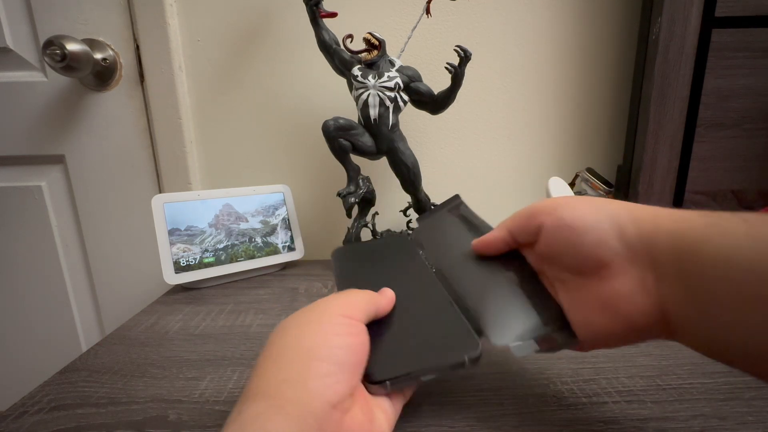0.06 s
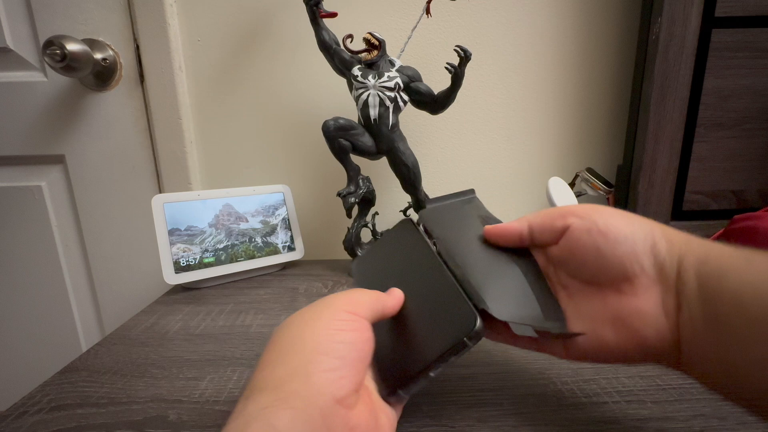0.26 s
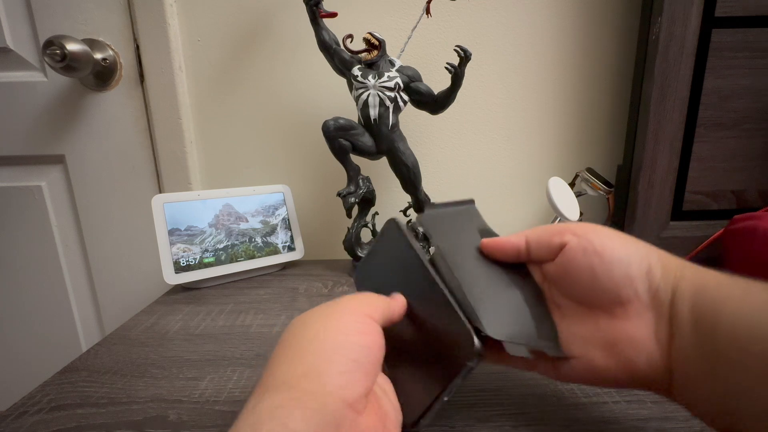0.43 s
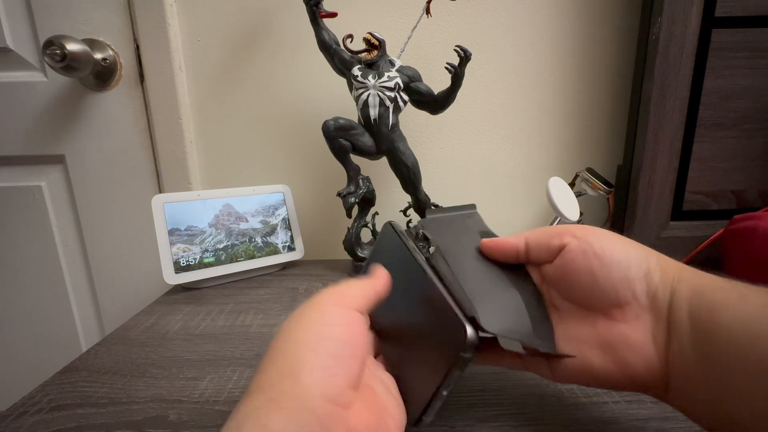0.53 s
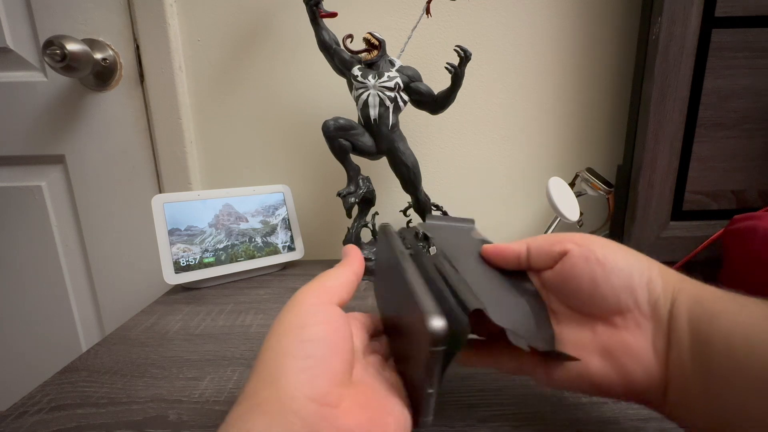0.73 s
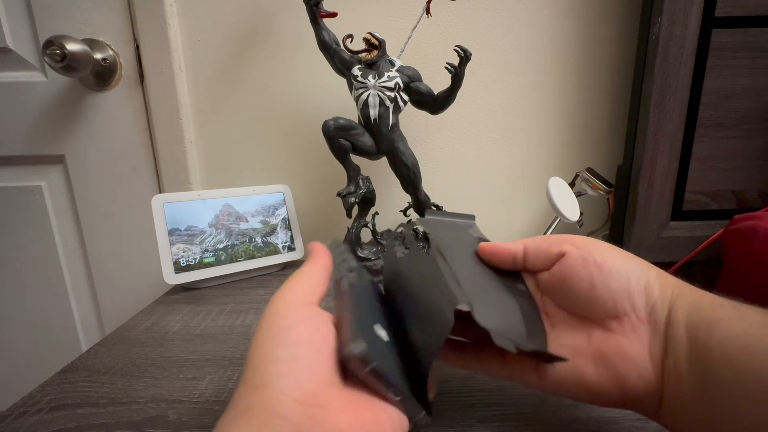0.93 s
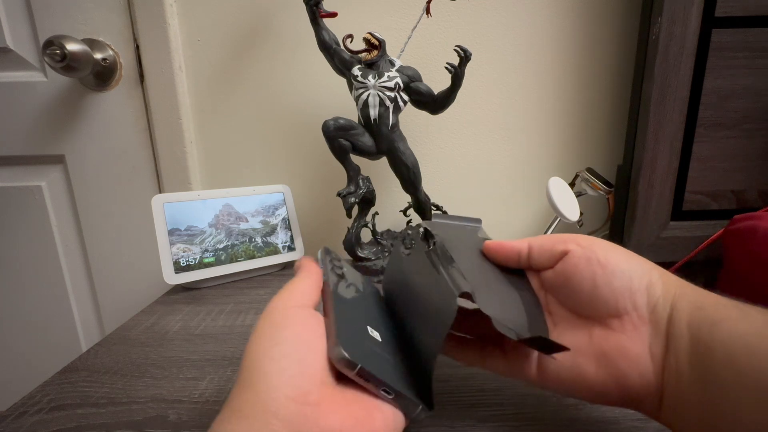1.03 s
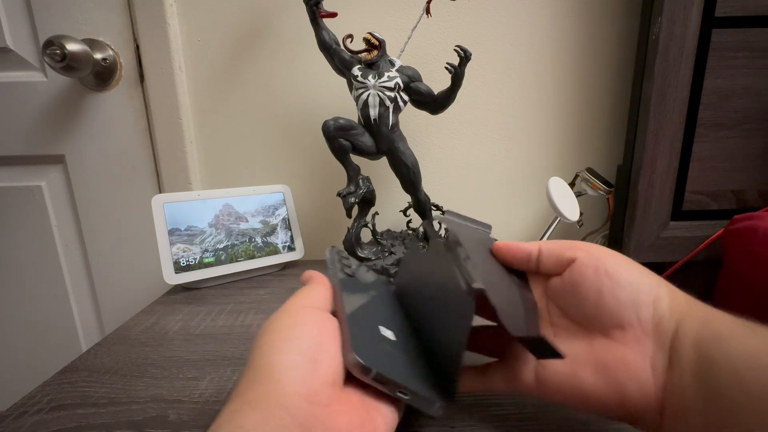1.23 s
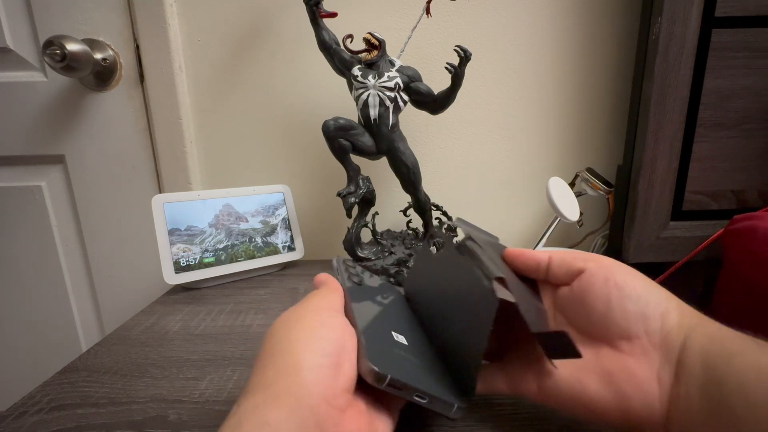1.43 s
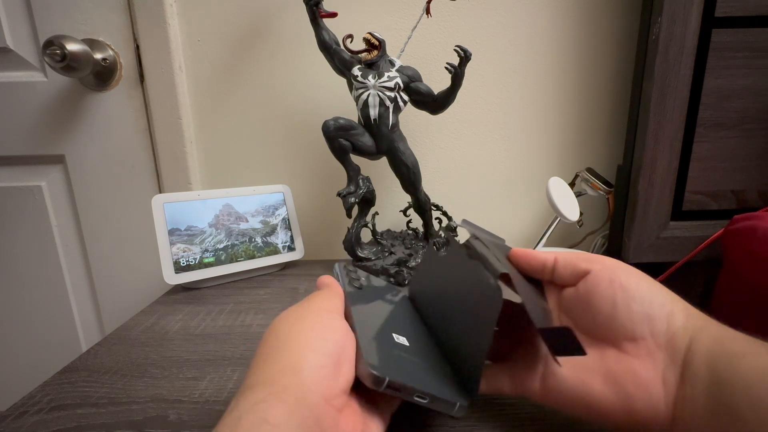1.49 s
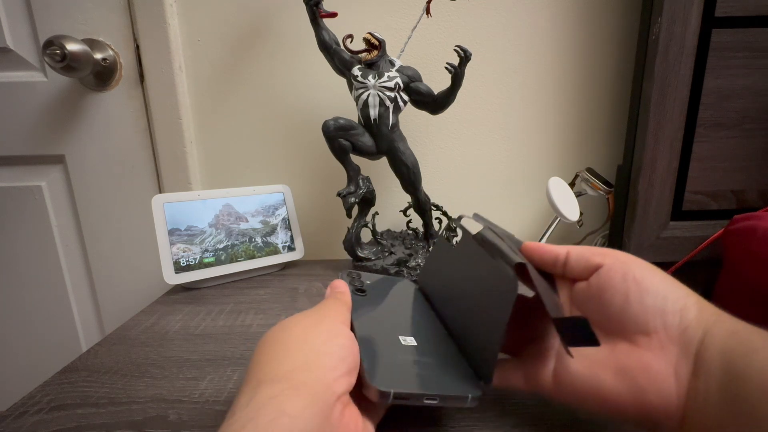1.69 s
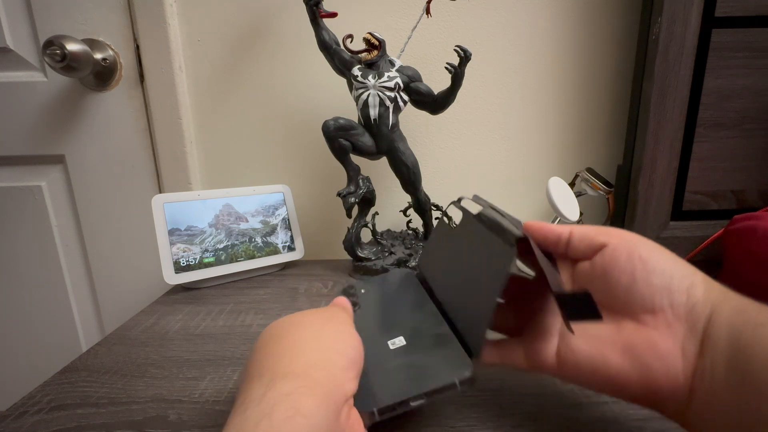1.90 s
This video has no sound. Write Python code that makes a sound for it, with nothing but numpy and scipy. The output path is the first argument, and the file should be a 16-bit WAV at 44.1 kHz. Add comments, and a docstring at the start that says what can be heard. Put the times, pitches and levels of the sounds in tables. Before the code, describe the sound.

Stiff plastic film peeled off a handheld device, sharp snaps and crackles over faint hiss, close up

```python
"""First a faint hiss over low rumble and mains hum, then sharp snaps: stiff protective film
is peeled off a new handheld device in a small room, close to a pair of microphones.
Noise grains make the film hiss; filtered noise bursts make it snap as it buckles, and a sliding sine squeaks.
Damped cosines and low sine pulses are knocks and finger thumps on the device.
A wall and the desk return these sounds as scattered echoes with a short noise tail."""
import sys
import numpy as np
from scipy import signal
from scipy.fft import rfft, irfft, next_fast_len
from scipy.io import wavfile
from scipy.ndimage import uniform_filter1d

SR = 44100
rng = np.random.default_rng(int(sys.argv[2]) if len(sys.argv) > 2 else 0)


def bounce(signal):
    """Save signal as a 16-bit WAV file at the path given by the first command-line argument."""
    frames = np.transpose(np.atleast_2d(signal))
    limited = np.clip(frames, -1, 1)
    pcm = np.round(limited * 32767).astype(np.int16)
    wavfile.write(sys.argv[1], SR, pcm)


N = 85995
T = np.arange(N) / SR


def amp(db):
    """Decibels to gain."""
    return 10 ** (np.asarray(db) / 20)


def unit(x):
    """Scales to rms 1."""
    return x / np.sqrt(np.mean(x ** 2) + 1e-20)


def read(points, hz):
    """Reads a spectrum on a log-frequency axis."""
    f, value = np.transpose(points)
    return np.interp(np.log(hz + 1), np.log(f + 1), value)


def level(points):
    """Gain over time from (t/s, level/dB) points."""
    return amp(np.interp(T, *np.transpose(points)))


def add(mix, s, sound):
    """Mixes a sound in at a time, cut off at the end of the mix."""
    part = mix[:, max(round(s * SR), 0):][:, :sound.shape[1]]
    part += sound[:, :part.shape[1]]


def bell(hz, centre_hz, width):
    """Gain of a resonance, symmetric in log frequency; width is a share of the centre frequency."""
    return 1 / (1 + (np.log((hz + 1) / centre_hz) / width) ** 2 / 2)


def colour(x, gain):
    """Causal minimum-phase filter with the given gain as a function of frequency."""
    size = next_fast_len(x.shape[-1] + 4096)
    hz = abs(np.fft.fftfreq(size, 1 / SR))
    log_gain = np.log(np.maximum(gain(hz), 1e-5))
    # the Hilbert transform of the log gain gives the phase
    response = np.exp(np.conj(signal.hilbert(log_gain)))
    return np.fft.ifft(np.fft.fft(x, size) * response).real[..., :x.shape[-1]]


def pair(three, same):
    """Left and right from one shared and two separate signals; same is the shared part of the power."""
    same = np.clip(same, 0, 1)
    return np.sqrt(same) * three[0] + np.sqrt(1 - same) * three[1:]


def noise_pair(same, count=N):
    """White noise at the two microphones."""
    return pair(rng.standard_normal((3, count)), same)


# Creases of the film giving way close to the microphones; levels are relative. Columns: t/s,
# crack level at 3 kHz/dB, crack decay/s, low edge f/Hz, tilt/(dB per octave), flexing panel f/Hz,
# panel level/dB, panel width (share of f), edge tick level/dB, left minus right level/dB
CREASE_SNAPS = [ (0.0768, -62, 0.00079, 2650, -1, 4450, -49.5, 0.17, -78, 1),
                (.1200, -48, 0.0023, 830, -3, 2170, -36.5, 0.088, -55, -1.5),
                (.2335, -35, 0.0013, 732, -5.5, 2980, -22, 0.35, -68, 1.7),
                (0.354, -34, 0.0023, 750, -2, 1620, -24, 0.038, -66, 0.5),
                (0.431, -34, 0.0005, 1570, 0, 2030, -27, 0.087, -23.5, 2.3),
                (.6505, -16, 0.00064, 1050, -2, 2140, -6.5, 0.095, -42, 1),
                (.7372, -25.5, .0014, 1570, 1.2, 3430, -19.5, 0.15, -41, 2.5),
                (0.9485, -47, 0.0036, 1094, -5, 2000, -34.5, 0.46, -29, 1.5),
                (1.1174, -61, 0.00095, 800, 0.5, 2270, -50.5, 0.53, -62, 1),
                (1.1482, -47, 0.0018, 860, 0, 1680, -57, 0.13, -40, 0.5),
                (1.1903, -52.5, 0.00079, 1194, -6, 3500, -55, 0.22, -74, 3),
                (1.2585, -35, 0.0013, 1400, -1, 2450, -22, 0.15, -34, 0),
                (1.2768, -36, 0.0011, 1350, -4.5, 5200, -26.5, 0.13, -39, 0),
                (1.2838, -39, 0.0015, 1140, -5, 5300, -37.5, 0.12, -58, -1.5),
                (1.4791, -35.5, 0.00033, 1700, -3.5, 2700, -26.5, 0.15, -49, 1.9),
                (1.9261, -43, 0.0032, 666, -0.5, 2210, -58.5, .1, -45, 2.5)]
SNAP_DB = 8  # common gain of all snaps
SWELL_S, SWELL_DB = 0.00095, -7  # rise before the crack
AFTER_S, AFTER_DB = 0.0043, -11.5  # slower decay under the crack
SNAP_SAME = 0.31
RIPPLE_DB, RIPPLE_OFFSET_DB, RIPPLE_HZ = 9, -2.25, 331.9  # uneven resonances: swing, shift, spacing
OVERTONE_RATIO, OVERTONE_DB = 1.66, -14  # second bending mode of a panel
TICK_HZ, TICK_WIDTH = 14800, 0.07


def snap(s, crack_db, decay_s, low_hz, tilt_db, panel_hz, panel_db, panel_width, tick_db, pan_db):
    """A crease gives way: a brief swell, a crack, and a quickly damped ring of the film panel."""
    lead = 192  # samples before the crack
    t = (np.arange(2048) - lead) / SR
    swell = amp(SWELL_DB) * np.exp(-abs(t) / SWELL_S)
    decay = np.exp(-abs(t) / decay_s) + amp(AFTER_DB) * np.exp(-abs(t) / AFTER_S)
    shape = np.where(t < 0, swell, decay)
    burst = noise_pair(SNAP_SAME, len(t)) * shape
    for _ in range(3):  # a crack is short in time and even in spectrum
        spectrum = rfft(burst)
        burst = irfft(spectrum / (abs(spectrum) + 1e-9))
        local_power = abs(uniform_filter1d(burst ** 2, size=40))
        burst *= shape / np.sqrt(local_power + 1e-12)
    burst /= np.linalg.norm(burst, axis=1, keepdims=True)
    ripple = rng.uniform(-1.03, 1, size=128)

    def gain(hz):
        """Crack, panel and edge tick added in power, above the low edge."""
        tilt = tilt_db * np.log2(np.maximum(hz, low_hz) / 3000)
        uneven = RIPPLE_DB * np.interp(hz / RIPPLE_HZ, np.arange(len(ripple)), ripple) + RIPPLE_OFFSET_DB
        crack = amp(crack_db + tilt + uneven)
        overtone = amp(OVERTONE_DB) * bell(hz, panel_hz * OVERTONE_RATIO, panel_width)
        panel = amp(panel_db) * np.hypot(bell(hz, panel_hz, panel_width), overtone)
        tick = amp(tick_db) * bell(hz, TICK_HZ, TICK_WIDTH)
        low_cut = np.hypot(1, (low_hz / (hz + 1)) ** 3.16)
        return np.sqrt(crack ** 2 + panel ** 2 + tick ** 2) / low_cut

    sides = amp([[pan_db / 2], [-pan_db / 2]])
    return s - lead / SR, np.sqrt(350) * amp(SNAP_DB) * colour(burst, gain) * sides


# Loudness of the peeling film, shared by hiss and crackle: t/s, level/dB
PEEL_LEVEL = [(0, -57.5), (.10, -54), (.205, -58), (.24, -42.5), (.32, -55), (.37, -55.5), (.46, -53),
              (.53, -64), (.62, -60.5), (.80, -54), (.915, -51), (1.0, -57), (1.09, -60), (1.135, -53),
              (1.19, -45.5), (1.25, -55.5), (1.36, -60.5), (1.46, -60.5), (1.56, -57), (1.66, -62.5),
              (1.745, -64), (1.80, -78.5), (1.95, -70.5)]
# Spectrum of the hiss: f/Hz, relative level per Hz/dB
HISS_SPECTRUM = [(100, -27), (550, -11.5), (950, 1.5), (1500, 5), (2200, 7.5), (3200, 1), (5500, 4),
                 (9000, 1), (14500, 6), (17000, -2.5)]
GRAINS_PER_S, GRAIN_SPREAD_DB = 7500, 3.5
SMOOTH_DB = 8.5  # smooth noise relative to the grains
FLUTTER_DB, HISS_SAME = 1.73, 0.12


def peel():
    """Countless tiny bonds let go and the film slides: a fine, grainy hiss."""
    struck = rng.random(N) < GRAINS_PER_S / SR
    sizes = amp(GRAIN_SPREAD_DB * np.minimum(rng.exponential(1, N), 5)) * struck
    grains = unit(sizes * noise_pair(HISS_SAME))
    drive = grains + amp(SMOOTH_DB) * noise_pair(HISS_SAME)
    hiss = unit(colour(drive, lambda hz: amp(read(HISS_SPECTRUM, hz))))
    flutter = unit(uniform_filter1d(rng.standard_normal(N), size=600))
    return hiss * level(PEEL_LEVEL) * amp(FLUTTER_DB * flutter)


CRACKLES_PER_S, CRACKLE_SPREAD_DB = 160, 4
CRACKLE_DB = -11  # relative to the peel level
CRACKLE_S, CRACKLE_HZ, CRACKLE_WIDTH = 0.00082, 3200, 0.7  # decay time, centre, width


def crackle():
    """Larger patches of the film let go at random with tiny, ragged ticks."""
    struck = rng.random(N) < CRACKLES_PER_S / SR
    sizes = amp(CRACKLE_SPREAD_DB * np.minimum(rng.exponential(1, N), 2)) * struck
    bursts = signal.lfilter([1], [1, -np.exp(-1 / (CRACKLE_S * SR))], sizes)
    ticks = colour(bursts * noise_pair(0.55), lambda hz: bell(hz, CRACKLE_HZ, CRACKLE_WIDTH))
    return amp(CRACKLE_DB) * unit(ticks) * level(PEEL_LEVEL)


# Fine fizz on top of the hiss when the film runs fast: t/s, level/dB
FIZZ_LEVEL = [(0, -81), (.2, -75), (.25, -46), (.32, -39.5), (.38, -46), (.46, -62), (.53, -94), (.78, -82),
              (.87, -73), (1.0, -71), (1.1, -71), (1.2, -42.5), (1.25, -45.5), (1.34, -98), (1.47, -70),
              (1.56, -62.5), (1.66, -63), (1.74, -60), (1.8, -89.5)]
FIZZ_HZ, FIZZ_WIDTH = 13100, 0.16


def fizz():
    """The fastest stretches of the peel add a very fine, high sizzle."""
    noise = colour(noise_pair(0.6), lambda hz: bell(hz, FIZZ_HZ, FIZZ_WIDTH))
    return unit(noise) * level(FIZZ_LEVEL)


# Thin squeak of the sliding film: t/s, f/Hz, peak level/dB
SQUEAK_TRACK = [(1.61, 8800, -77), (1.633, 8650, -58.5), (1.679, 8240, -65.5), (1.71, 8000, -101)]


def squeak():
    """Fast stick-slip whose pitch sinks as the film slows."""
    s, hz, db = np.transpose(SQUEAK_TRACK)
    jitter = 1 + 0.0074 * unit(uniform_filter1d(rng.standard_normal(N), size=40))
    phase = 2 * np.pi * np.cumsum(np.interp(T, s, hz) * jitter) / SR
    sounding = (T > s[0]) * (T < s[-1])
    return amp(np.interp(T, s, db)) * sounding * np.sin(phase)


# Knocks on the device: t/s, relative level/dB
DEVICE_KNOCKS = [(.2345, -23), (.3555, -31), (0.653, -39), (0.9495, -46), (1.1480, -53), (1.2588, -51.5),
                 (1.9268, -50.5)]
# Modes of the device body: f/Hz, relative level/dB, t60/s
BODY_MODES = [(265, -10.5, 0.024), (337, 1, 0.035), (407, -0.5, 0.029), (896, -1.5, 0.034),
              (1300, -1, .022)]
KNOCK_RISE_S = 0.003


def knock(s, db):
    """The hand-damped body of the device rings briefly."""
    t = np.arange(SR // 8) / SR
    ring = np.zeros(len(t))
    for hz, mode_db, t60 in BODY_MODES:
        ring += amp(db + mode_db - 60 * t / t60) * np.cos(2 * np.pi * hz * t)
    return s, ring * (1 - np.exp(-t / KNOCK_RISE_S)) * amp([[2], [-2.5]])


# Soft thumps of the fingers on the device: t/s, f/Hz, relative level/dB
FINGER_THUMPS = [(0.236, 162, -46), (0.657, 167.8, -45.5), (0.726, 144, -47)]
THUMP_S = 0.0031  # time to the strongest point


def thump(s, hz, db):
    """A fingertip gives the device a soft, low push."""
    t = np.arange(SR // 8) / SR
    push = t / THUMP_S * np.exp(1 - t / THUMP_S)
    return s, amp(db) * push * np.sin(2 * np.pi * hz * t) * amp([[2], [-2]])


# Scattered reflections from wall and desk: delay t/s, left and right relative level/dB
WALL_ECHOES = [(.0068, -20, -17), (0.0128, -15.5, -17.5), (0.0115, -9.5, -17.5), (0.0126, -22, -16.5),
               (0.018, -15, -29)]
# Reverberation time of the room: f/Hz, t60/s
ROOM_T60 = [(200, 0.12), (550, 0.22), (1400, 0.18), (3700, 0.27), (9000, .2), (16000, 0.25)]
# Colour of the reverberation: f/Hz, level/dB
TAIL_COLOUR = [(200, -9), (1000, -2.5), (3000, -11), (6000, -8.5), (10000, -11.5), (16000, -18.5)]
ROOM_BUILD_S = 0.01
ECHO_DULL_HZ, ECHO_SCATTER_S = 6300, 0.0012
ECHO_DB = -3.5  # common gain of all echoes


def room(x):
    """Wall and desk give a few dull, scattered echoes and a short diffuse tail."""
    hz, t, bands = signal.stft(noise_pair(0.12, SR // 2), SR, nperseg=256)
    decay = amp(-60 * t / read(ROOM_T60, hz)[:, None])
    tail = signal.istft(bands * decay, SR, nperseg=256)[1]
    tail *= np.minimum(np.arange(tail.shape[1]) / SR / ROOM_BUILD_S, 1)
    tail = colour(tail / np.linalg.norm(tail[0]), lambda hz: amp(read(TAIL_COLOUR, hz)))
    early = np.zeros_like(tail)
    scatter_t = np.arange(SR // 200) / SR
    for delay_s, left_db, right_db in WALL_ECHOES:
        scatter = rng.standard_normal((2, len(scatter_t))) * np.exp(-scatter_t / ECHO_SCATTER_S)
        scatter /= np.linalg.norm(scatter, axis=1, keepdims=True)
        add(early, delay_s, amp([[left_db], [right_db]]) * scatter)
    early = colour(early, lambda hz: amp(ECHO_DB) / np.hypot(1, (hz / ECHO_DULL_HZ) ** 2))
    return signal.fftconvolve(x, tail + early, axes=1)[:, :N]


# Spectrum of the room rumble: f/Hz, relative level per Hz/dB
RUMBLE_SPECTRUM = [(20, -20.5), (40, -4.5), (60, 14), (85, 1.5), (130, -3), (220, -21), (350, -17),
                   (550, -36.5), (1000, -18.5), (2500, -32.5), (8000, -49.5), (16000, -45.5)]
# Soft rubbing of the hands, before the side gains: t/s, level/dB
HANDS_LEVEL = [(0, -58), (.6, -64), (.72, -54), (.85, -67), (1.1, -65.5), (1.3, -60), (1.65, -58),
               (1.95, -68.5)]
HANDS_HZ, HANDS_WIDTH = 145, 0.35
HUM_HZ = 59.3
RUMBLE_DB, HUM_DB = -57, -63  # rms, before the side gains


def background():
    """Coloured noise is room rumble and the dull rub of hands; a sine is mains hum."""
    rumble = unit(colour(noise_pair(0.87), lambda hz: amp(read(RUMBLE_SPECTRUM, hz))))
    hands = unit(colour(noise_pair(0.2), lambda hz: bell(hz, HANDS_HZ, HANDS_WIDTH)))
    hum = np.sqrt(2) * np.sin(2 * np.pi * HUM_HZ * T)
    bed = amp(RUMBLE_DB) * rumble + amp(HUM_DB) * hum + level(HANDS_LEVEL) * hands
    return bed * amp([[1.1], [-1.1]])


PORT_LAG_S = 0.00009  # the film is nearer to the left microphone than to the right


def scene():
    """Film and device close by, their return from the room, and the background."""
    near = peel() + fizz() + crackle() + squeak()
    for source, rows in ((snap, CREASE_SNAPS), (knock, DEVICE_KNOCKS), (thump, FINGER_THUMPS)):
        for row in rows:
            add(near, *source(*row))
    near = np.array([near[0], np.roll(near[1], round(PORT_LAG_S * SR))])
    return near + room(near) + background()


# Microphone colour: f/Hz, level/dB
MIC_COLOUR = [(20, -8), (9900, -1), (10500, -12), (11000, -22), (12300, -22.5), (12900, -10), (14200, -8.5),
              (15600, -6), (16300, -20.5)]
PEAK_LIMIT = 0.85  # full scale is 1
EDGE_HZ = 16700


def record(dry):
    """Microphone colour, soft rounding of the highest peaks, then the band limit."""
    heard = colour(dry, lambda hz: amp(read(MIC_COLOUR, hz)))
    heard = heard / (1 + (heard / PEAK_LIMIT) ** 6) ** (1 / 6)
    low_pass = signal.firwin(511, EDGE_HZ, window=("kaiser", 9), fs=SR)
    return signal.oaconvolve(heard, low_pass[None], "same")


dry = scene()
out = record(dry)
bounce(out)
```